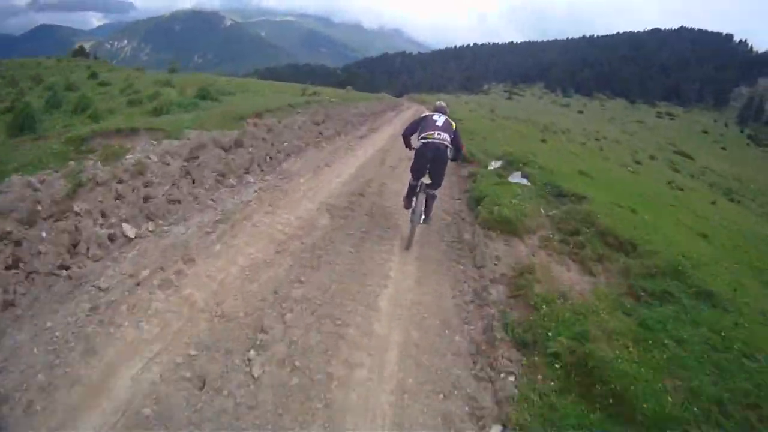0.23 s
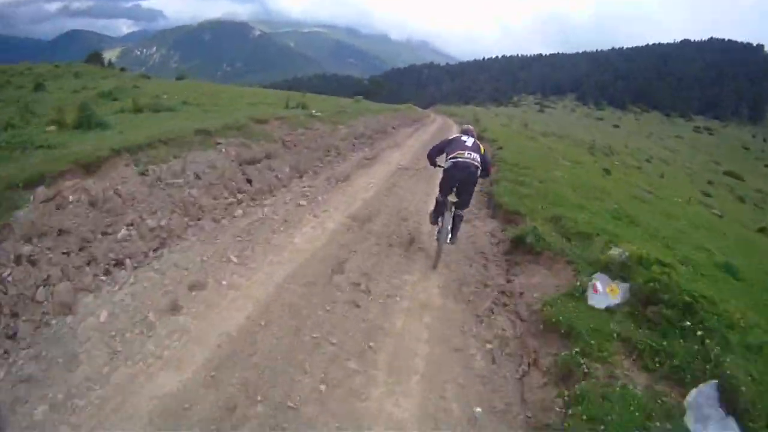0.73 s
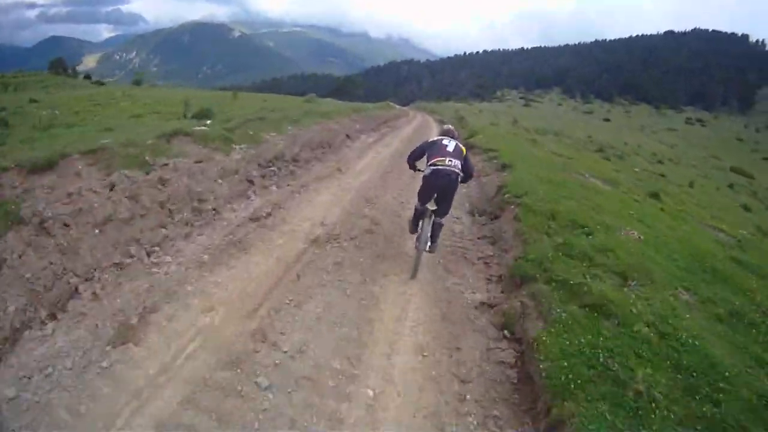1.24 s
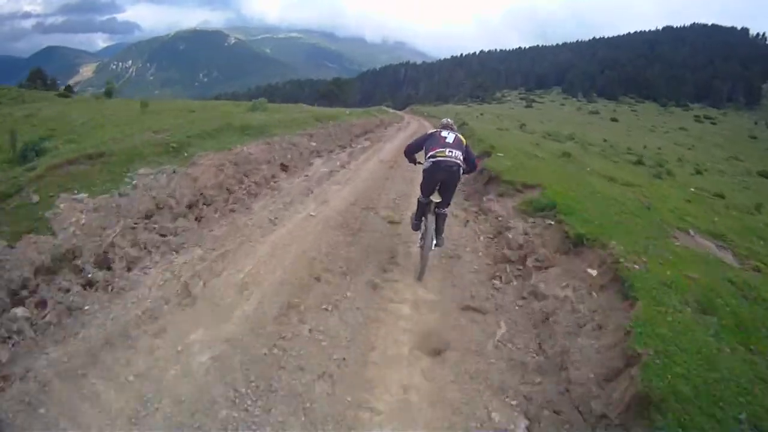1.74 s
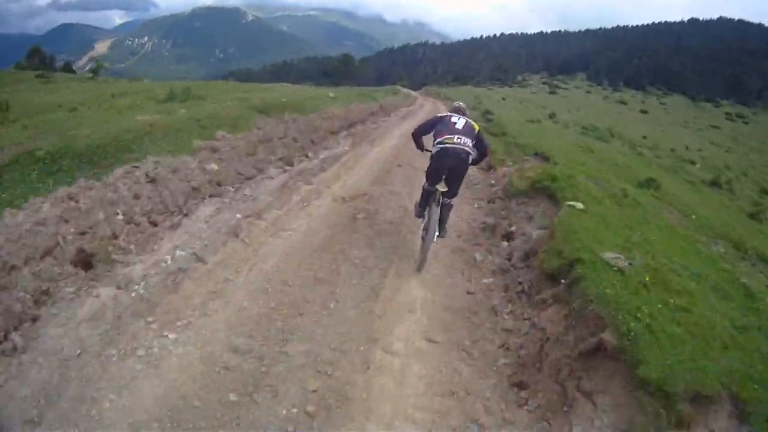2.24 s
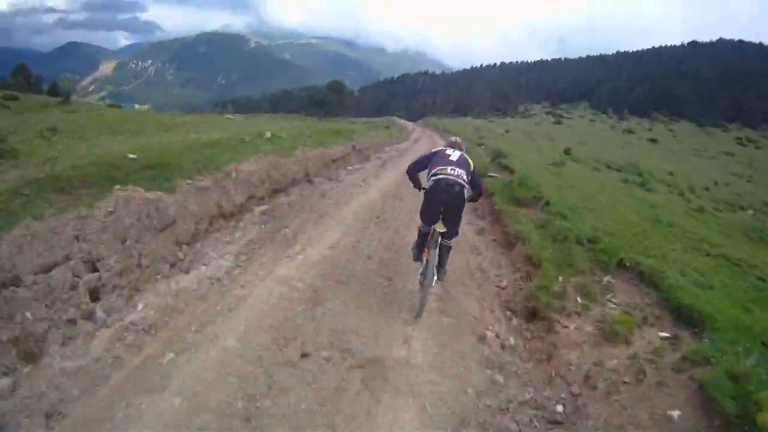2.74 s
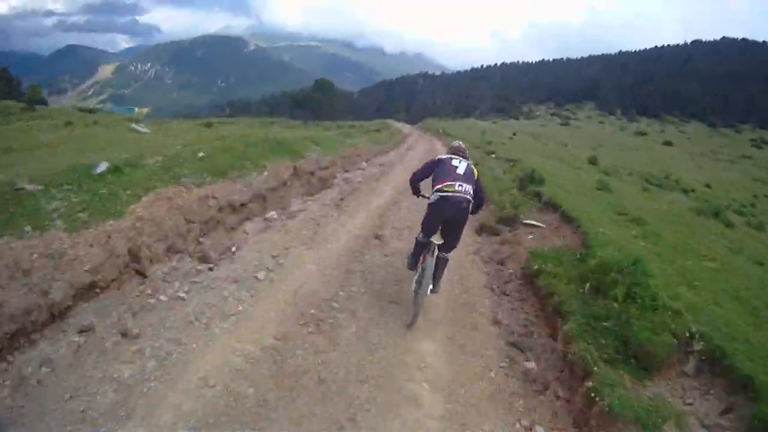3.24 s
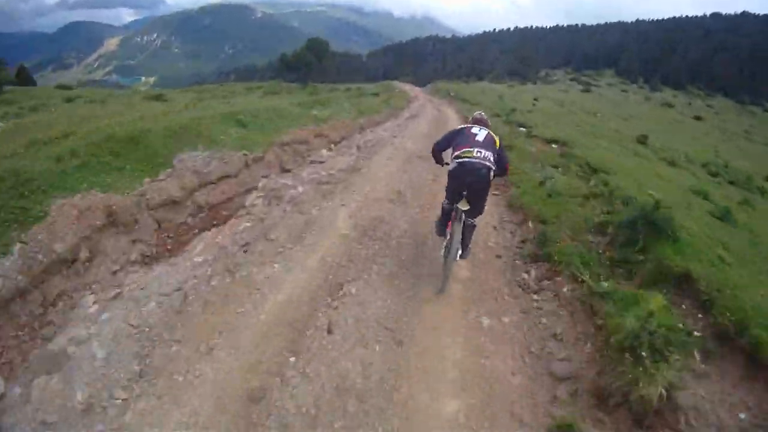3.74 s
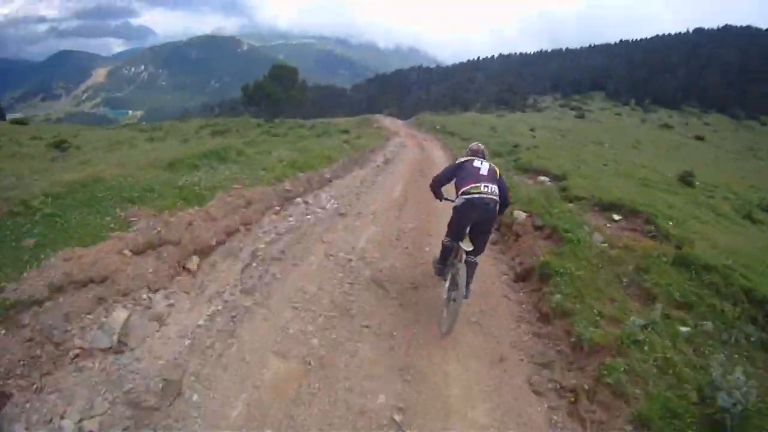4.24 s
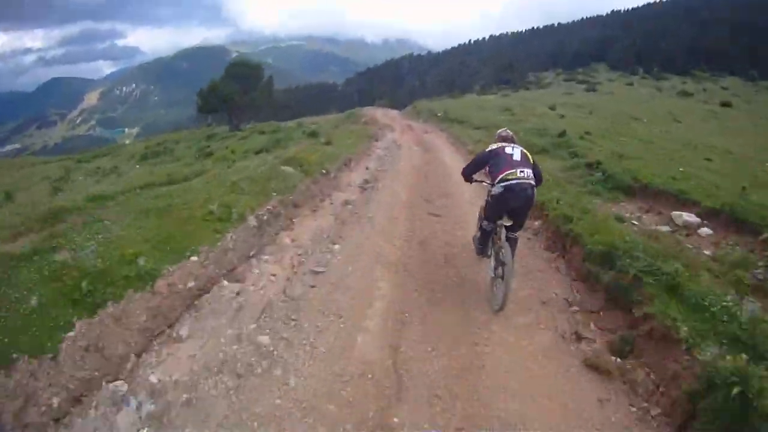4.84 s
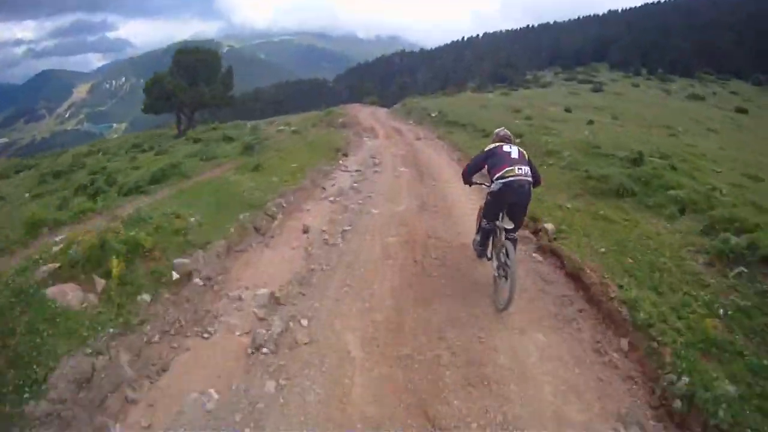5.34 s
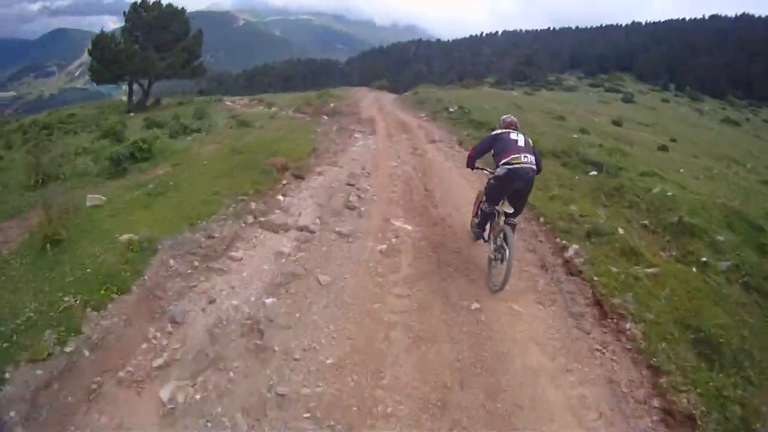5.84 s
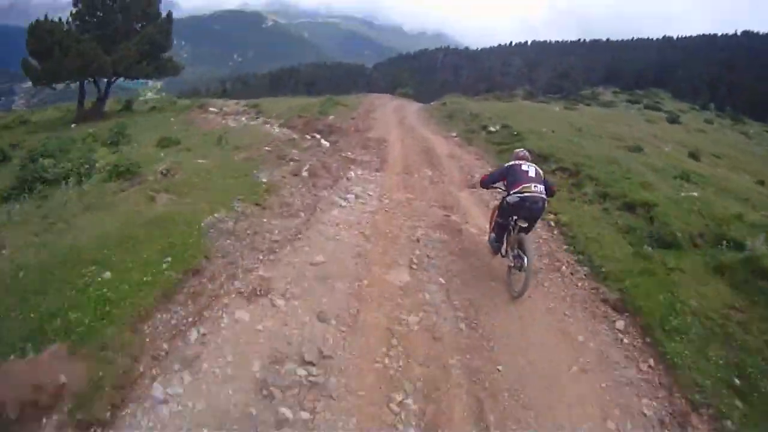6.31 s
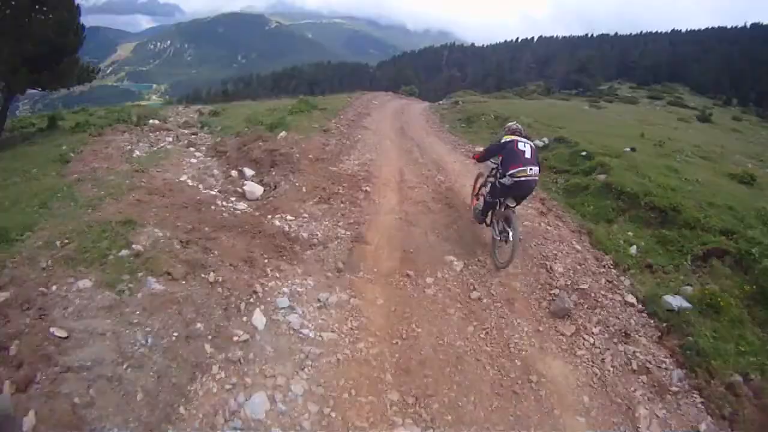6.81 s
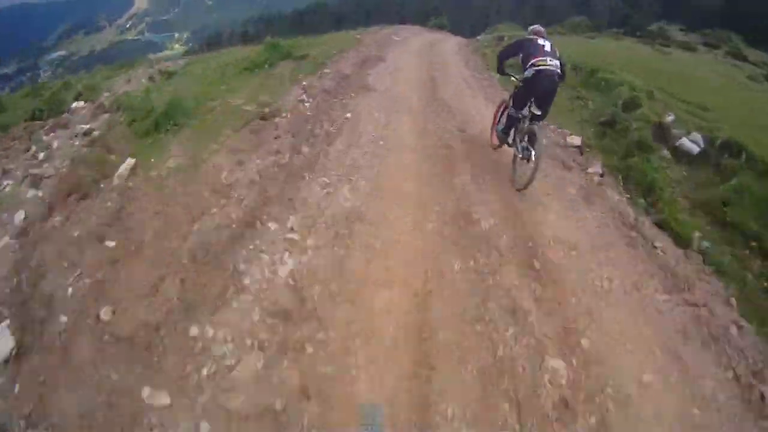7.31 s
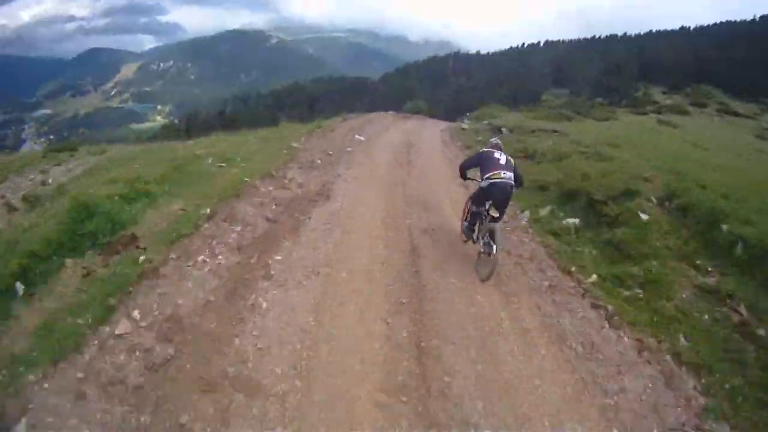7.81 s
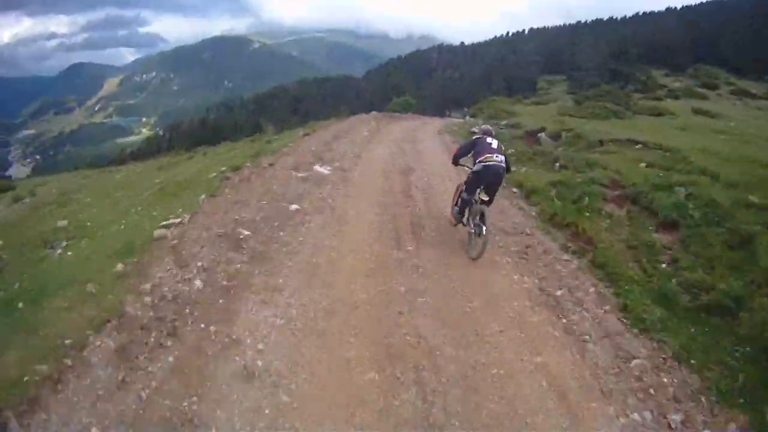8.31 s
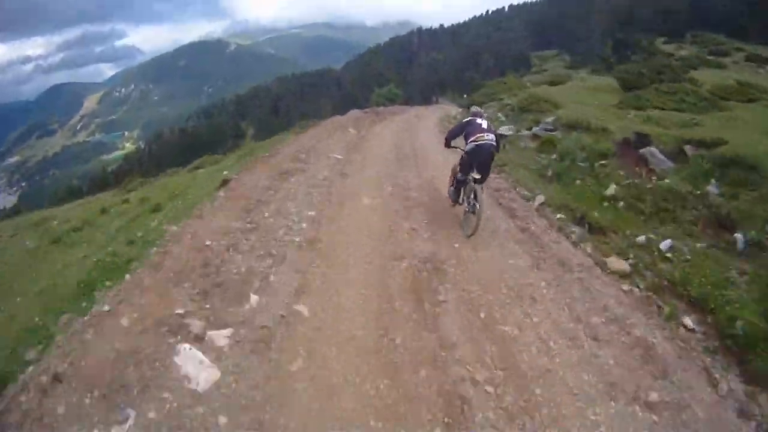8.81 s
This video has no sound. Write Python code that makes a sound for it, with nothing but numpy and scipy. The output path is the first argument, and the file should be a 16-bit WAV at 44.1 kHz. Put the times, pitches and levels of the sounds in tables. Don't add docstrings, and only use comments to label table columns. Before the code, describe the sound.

Breathy, overloading wind whistle around 1.7 kHz flutters over hissing gravel tyres, then gives way to low wind buffeting and sharp stone ticks.

```python
import sys
import numpy as np
from scipy import signal
from scipy.io import wavfile

SR = 44100
rng = np.random.default_rng(int(sys.argv[2]) if len(sys.argv) > 2 else 0)


def boost(x):
    u = np.asarray(x, float) / 20
    return 10 ** u


def wrap_up_sound(samples):
    columns = np.atleast_2d(samples).T
    tamed = np.clip(columns, -1, 1)
    steps = np.round(tamed * 32767).astype(np.int16)
    wavfile.write(sys.argv[1], SR, steps)


N = 399546

# (time [s], peak level [dB], centre pitch [Hz])
SLAPS = [
    (1.836, -2.5, 520),
    (2.189, -15, 400),
    (2.329, -11, 550),
    (2.543, -12, 330),
    (2.77, -11, 500),
    (2.801, -23, 500),
    (3.196, -6.5, 520),
]


def rms_one(x):
    return x / np.sqrt(np.mean(np.abs(x) ** 2) + 1e-20)


def low_noise(hz, white):
    r = np.exp(-2 * np.pi * hz / SR)
    return rms_one(signal.lfilter([1], [1, -2 * r, r * r], white))


def drift(hz):
    return low_noise(hz, rng.standard_normal(N + SR))[SR:]


def resonance(x, hz, width):
    r = np.exp(-np.pi * width / SR)
    top_gain_one = np.array([1, 0, -1]) * (1 - r * r) / 2
    return signal.lfilter(top_gain_one, [1, -2 * r * np.cos(2 * np.pi * hz / SR), r * r], x)


def in_time(rows):
    s, *columns = np.transpose(rows)
    return [np.interp(np.arange(N) / SR, s, c) for c in columns]


def swells(rows, column):
    out = np.zeros(N)
    for row in rows:
        length = row[column] * SR / 1000
        at, reach = int(row[0] * SR), int(row[column] * SR / 400)
        near = np.arange(max(at - reach, 0), min(at + reach, N))
        bell = boost(row[1]) * np.exp(-2 * ((near - at) / length) ** 2)
        out[near] = np.maximum(out[near], bell)
    return out


def banded(white, spectrum, low_hz, count, lumps_db, patchy_db, flicker):
    out = 0
    hz, db = np.transpose(spectrum)
    edges = low_hz * 2 ** (np.arange(count + 1) / 3)
    for k, (low, high) in enumerate(zip(edges, edges[1:])):
        band_pass = signal.butter(2, [low, high], "band", fs=SR, output="sos")
        band = signal.sosfilt(band_pass, white[k % 2])
        level_db = np.interp(np.log(low * high) / 2, np.log(hz), db)
        own_flicker = np.roll(flicker, k * 31337)
        out = out + band * boost(level_db + patchy_db * own_flicker)
    return rms_one(out * boost(lumps_db))


def grains(per_s, spread_db, clump_db):
    size_db = spread_db * np.minimum(rng.exponential(1, (2, N)), 4)
    sizes = boost(size_db) * rng.choice([-1, 1], (2, N))
    chance = per_s * boost(clump_db * drift(30)) / SR
    return rms_one(sizes * (rng.random((2, N)) < chance))


def whistle():
    # (time [s], level [dB], pitch [Hz])
    blowing = [(0.0, -12, 1685), (0.17, -12, 1690), (0.42, -14, 1694), (0.86, -13.5, 1695),
               (1.1, -15.5, 1670), (2.1, -13, 1674), (2.4, -10, 1767), (3.1, -14, 1673), (3.7, -13, 1662),
               (3.94, -11, 1728), (4.04, -16, 1662), (4.43, -15, 1726), (4.51, -23.5, 1684),
               (6.65, -18.5, 1678), (6.85, -22, 1681), (7.3, -15.5, 1650), (7.7, -25.5, 1640),
               (9.06, -25, 1659)]
    # (time [s], change of level [dB], length [ms])
    lulls = [(0.02, -9.5, 30), (0.31, -10, 45), (1.27, -10, 43), (1.42, 2.5, 100), (1.55, -6, 60),
             (1.82, -2, 96), (2.0, -3.5, 50), (3.3, -1, 130), (4.23, -5, 27), (5.75, -5.5, 110),
             (6.619, -6, 26), (7.07, -9, 120), (7.5, 2.5, 60), (8.7, 6, 60), (8.871, 4.5, 60)]
    # (pitch [Hz], width [Hz], level [dB], share of swings followed [0-1])
    housing = [(1232, 30, -40, .6), (1500, 180, -28, .8), (1350, 250, -36, .3), (2250, 600, -37, .5),
               (850, 500, -40, .5)]

    level_db, hz = in_time(blowing)
    level_db = level_db + sum(db * swells([(s, 0, ms)], column=2) for s, db, ms in lulls)
    white = rng.standard_normal((3, N))

    flutter_db = level_db + 5.5 + 0.67 * drift(5.1) + 1.6 * drift(22)
    flutter = low_noise(93.4, white[0] + 1j * white[1]) * boost(flutter_db)
    ceiling = 0.76
    size = np.abs(flutter)
    flutter *= ceiling * np.tanh(size / ceiling) / (size + 1e-9)
    turn = np.exp(2j * np.pi * np.cumsum(hz) / SR)

    rises = beats()
    surge = swells(rises, column=2)
    rise_hz_per_db, waver_hz = 3.6, 18.0
    surge_hz = hz + rise_hz_per_db * in_time(rises)[0] - 0.12 * SR * np.gradient(surge)
    surge_hz = surge_hz + waver_hz * np.roll(low_noise(25, white[0]), SR)
    locked = np.sin(2 * np.pi * np.cumsum(surge_hz) / SR)

    free = np.exp(-(surge / np.minimum(2 * boost(level_db), 0.45)) ** 2)
    tone = free * (flutter * turn).real + surge * locked
    tone = signal.sosfiltfilt(signal.butter(3, 2350, fs=SR, output="sos"), tone)

    swing_db = level_db - np.mean(level_db)
    walls = 0
    for f, width, db, share in housing:
        ring = resonance(resonance(white[2], f, width), f, 0.7 * width)
        walls = walls + boost(db + share * swing_db) * rms_one(ring)
    walls = signal.sosfilt(signal.butter(5, 2600, fs=SR, output="sos"), walls)
    return tone + (0.55 + 0.45 * free) * walls


def beats():
    # (time of first [s], peak level [dB], beat period [ms], beats [count])
    surges = [(0.1822, 1.5, 5.5, 1), (0.4578, 2.5, 6.5, 1), (0.839, 2, 10, 3), (0.8937, 2, 5.82, 1),
              (1.684, 1.5, 6.9, 1), (1.9209, 1, 4.4, 1), (2.108, 0.9, 5, 1), (2.2836, 1, 12, 1),
              (2.3011, 2.5, 4.6, 1), (2.397, 1.7, 14, 3), (2.4449, 1.97, 11, 2), (2.4882, 1.5, 9.5, 3),
              (2.4968, 3.5, 12.6, 1), (2.584, 1.5, 7, 1), (2.6006, 2.5, 11, 2), (2.6519, 3.5, 11, 1),
              (2.711, 2.4, 4.8, 1), (2.793, 5, 5.5, 1), (3.6192, 1, 10.6, 1), (3.6492, 1, 10.3, 1),
              (3.685, 2, 8, 1), (3.735, 2, 17, 1), (3.7968, 2, 9.9, 1), (3.811, 3, 5.4, 1),
              (3.844, 2, 21, 1), (3.8708, 1.5, 9.7, 1), (3.8816, 3, 8.1, 3), (3.9245, 2.5, 7.7, 2),
              (3.9445, 1.3, 12, 2), (7.2566, 0.05, 11, 2)]
    # (time [s], peak level [dB])
    puffs = [(0.079, -1.5), (0.235, -1.5), (0.802, 0), (0.817, 0), (0.9306, -0.4), (1.1778, -0.75),
             (1.4318, -0.5), (1.6359, -0.23), (1.7428, -0.5), (1.852, -.5), (2.0772, -1), (2.124, 0),
             (2.2055, 1), (2.2623, -1.4), (2.352, 0), (2.378, 0.5), (2.6338, 0), (2.733, 0.63), (3.051, -1),
             (3.174, -.5), (3.5466, -.5), (3.7467, -0.4), (3.824, 0), (3.907, 1.2), (4.302, -3),
             (7.282, -0.5), (6.4477, -5.5), (6.5653, -3), (6.684, -4), (7.245, -2.5)]
    beat_fill, longest_beat_ms = 0.85, 8.2
    puff_ms, puff_top_db = 7.9, -1.4

    rows = []
    for s, db, ms, count in surges:
        sounding_ms = beat_fill * (ms if count < 1.5 else min(ms, longest_beat_ms))
        for k in range(round(count)):
            rows.append((s + k * ms / 1000, db, sounding_ms))
    rows += [(s, min(db, puff_top_db), puff_ms) for s, db in puffs]
    return sorted(rows)


def slaps():
    t = np.arange(N) / SR
    out = np.zeros(N)
    for s, db, hz in SLAPS:
        pulse = (t - s) * 4.7 * hz * np.exp(-0.5 * ((t - s) * 7.1 * hz) ** 2)
        out += boost(db) * 1.43 * pulse
    return out


def buffet():
    # (pitch [Hz], level per Hz [dB])
    colour = [(15, -65), (25, -30), (86, -19.5), (284, -3), (358, -2), (482, 1.5), (779, 0), (904, -4.5),
              (1300, -5.5), (1690, -40), (2860, -120)]
    # (time [s], level [dB])
    swing = [(0.0, -46.5), (0.86, -59), (0.96, -38), (1.26, -35), (1.36, -29), (1.6, -29), (1.64, -48),
             (2.9, -50), (3.0, -37), (3.3, -50), (3.46, -40.5), (3.94, -54.5), (4.17, -24), (5.88, -23.5),
             (6.46, -32.5), (7.39, -36), (8.07, -26), (9.06, -24)]
    # (time [s], peak level [dB], length [ms])
    gusts = [(0.0, -26.5, 38), (0.319, -28.5, 184), (0.78, -38, 47), (1.3, -26, 39), (1.6, -24.5, 34),
             (1.84, -31.5, 70), (2.059, -33.5, 260), (2.18, -35, 37), (2.3, -35.5, 53), (2.55, -43, 30),
             (2.79, -30, 68), (3.19, -36, 34), (4.02, -34.5, 90), (6.63, -24.5, 114), (6.98, -24.5, 281),
             (7.519, -26.5, 80), (7.699, -32, 146)]
    lumps_db = 1.39 * drift(15) + 1.3 * drift(87)
    strength = np.hypot(boost(in_time(swing)[0]), swells(gusts, column=2))
    return strength * banded(rng.standard_normal((2, N)), colour, 25.4, 17, lumps_db, 1.0, drift(6.5))


def thumps():
    # (time [s], peak level [dB], centre pitch [Hz], length [ms], low push against the peak [dB])
    lumps = [(0.2, -25, 675, 10, -15), (1.269, -26.5, 543, 10, -9), (1.309, -39, 796, 8.5, -9),
             (1.823, -24, 545, 14, -38), (2.165, -31, 486, 6.2, -14), (2.189, -27, 380, 8.6, -23),
             (2.329, -26.5, 834, 5.6, -23), (2.531, -29.5, 304, 3.5, -16), (2.76, -25, 920, 21, -30),
             (3.193, -30.5, 540, 12, -30), (4.159, -29, 480, 13, -35), (7.116, -27, 158, 13.1, -7)]
    out, white = np.zeros(N), rng.standard_normal(N)
    low = resonance(white, 79, 87)
    for s, db, hz, ms, low_db in lumps:
        puff = resonance(resonance(white, hz, 1.3 * hz), hz, 1.3 * hz)
        puff = puff * swells([(s + 0.49 * ms / 1000, 0, ms)], column=2)
        push = low * swells([(s + 4.0 * ms / 1000, 0, 3.5 * ms)], column=2)
        both = puff / np.abs(puff).max() + boost(low_db) * push / np.abs(push).max()
        out += boost(db + 7.0) * both
    return out


def stones():
    # (time [s], peak level [dB], ring pitch [Hz])
    hits = [(0.8036, -23, 2620), (3.996, -34, 4400), (4.0457, -24, 4450), (4.748, -20, 2738),
            (5.003, -22.5, 4230), (5.039, -24, 4264), (5.1914, -22.5, 4350), (5.6467, -22, 4365),
            (5.867, -25, 4585), (6.1534, -24, 4400), (6.338, -20, 4610), (6.348, -18, 3280),
            (6.3875, -23, 4400), (5.948, -21.5, 2580), (6.538, -25, 4620), (7.0738, -26, 4516),
            (7.1294, -34, 4420), (7.1595, -29, 4420), (7.1728, -22.5, 4440), (7.2198, -24, 4000),
            (7.41, -21.5, 4684), (7.6088, -27.5, 4580), (7.74, -29, 4500), (7.873, -20.5, 4515),
            (7.952, -22, 4450), (7.9827, -21, 4350), (8.2493, -20.5, 4460), (8.541, -23, 4510),
            (8.565, -21, 4420)]
    # (pitch [Hz], width [Hz], level [dB])
    shell = [(4450, 700, -3), (2900, 1000, -8), (6200, 2600, -13)]
    out = np.zeros(N)
    scrapes = rng.standard_normal((len(hits), 300)) * np.exp(-np.arange(300) / 170.0)
    for (s, db, hz), scrape in zip(hits, scrapes):
        scrape = np.pad(scrape, (0, 500))
        ring = 0
        for f, width, gain_db in [*shell, (hz, 0.15 * hz, -2)]:
            ring = ring + boost(gain_db) * resonance(resonance(scrape, f, width), f, 2 * width)
        at = int(s * SR)
        out[at:at + len(ring)] += boost(db - 2.0) * ring / np.abs(ring).max()
    return signal.sosfilt(signal.butter(3, 6160, fs=SR, output="sos"), out)


def tyres():
    # (time [s], roar level [dB], crunch level [dB])
    track = [(0.0, -41.5, -48), (0.35, -45, -65), (1.21, -44, -72.5), (1.82, -44, -69), (2.34, -44, -61),
             (2.55, -42, -58), (2.82, -45.5, -71), (3.53, -41, -62.5), (3.76, -44, -60), (4.11, -42.5, -62),
             (4.67, -39, -59.5), (5.6, -42, -60), (5.85, -40.5, -65.5), (6.79, -43.5, -59),
             (7.22, -40, -52.5), (7.65, -43.5, -62), (9.06, -41.5, -73)]
    # (pitch [Hz], level per Hz [dB])
    roar_colour = [(1590, -36), (2700, 3), (3080, 6.5), (3410, 4.5), (4480, -12.5), (6300, -32.5),
                   (8190, -52), (13900, -120)]
    # (pitch [Hz], level per Hz [dB])
    crunch_colour = [(2350, -32), (4000, -2), (4520, -4.5), (5310, -10.5), (8100, -24), (10000, -35.5),
                     (13000, -60), (22000, -120)]
    roar_db, crunch_db = in_time(track)

    grit = grains(7000, 2.5, 1.8)
    ridge_hz, ridge_width_hz, ridge_db = 4480, 900, -2.5
    ridge = resonance(grit[0] - grit[1], ridge_hz, ridge_width_hz)
    ridge = rms_one(resonance(ridge, ridge_hz, ridge_width_hz))
    roar_lumps_db = 0.8 * drift(30) + 1.2 * drift(5)
    roar = banded(grit, roar_colour, 2500, 4, roar_lumps_db, 1.2, drift(20)) + boost(ridge_db) * ridge

    cracks = grains(1500, 4, 4)[[0, 0]]
    spray_db = 3.5 * drift(40) + 4.2 * drift(5)
    crunch = banded(cracks, crunch_colour, 4000, 4, spray_db, 1.5, drift(25))
    return boost(roar_db - 3.0) * roar + boost(crunch_db + 10.0) * crunch


def squeaks():
    # (time [s], peak level [dB])
    rubs = [
        (.81, -54),
        (4.38, -60),
        (4.82, -52),
        (8.53, -60),
        (8.971, -58),
    ]
    noise = resonance(rng.standard_normal(N), 8900, 1300)
    noise = rms_one(resonance(noise, 8900, 1300))
    return noise * swells([(s, db, 16.0) for s, db in rubs], column=2)


def electronics():
    whine_hz, flips_per_s, whine_db = 7867.1, 59.94, -63
    hum_hz, hum_width_hz, hum_db = 73, 24.0, -60
    hiss_db = -61.5
    t = np.arange(N) / SR
    flips = np.tanh(7.7 * np.sin(np.pi * flips_per_s * t))
    whine = np.sqrt(2) * boost(whine_db) * flips * np.sin(2 * np.pi * whine_hz * t)
    white = rng.standard_normal((2, N))
    hum = resonance(resonance(white[0], hum_hz, hum_width_hz), hum_hz, hum_width_hz)
    return whine + boost(hum_db) * rms_one(hum) + boost(hiss_db) * white[1]


def scene():
    choke = 1 - swells([(s, -3, 14) for s, db, hz in SLAPS], column=2)
    air = choke * whistle() + buffet() + thumps() + slaps()
    return (air + tyres() + stones() + electronics() + squeaks())[None]


def band_limit(x):
    return signal.sosfilt(signal.butter(12, 16130, fs=SR, output="sos"), x)


def record(dry):
    top, bias, knee = 0.91, 0.015, 75.0
    low_hz, high_hz = 500, 2500
    zero, pole = np.exp(-2 * np.pi * low_hz / SR), np.exp(-2 * np.pi * high_hz / SR)
    turn = np.exp(-2j * np.pi * 1700 / SR)
    unit = abs((1 - pole * turn) / (1 - zero * turn))
    ahead = signal.lfilter([1, -pole], [unit, -unit * zero], dry) + bias
    clipped = ahead / (1 + np.abs(ahead / top) ** knee) ** (1 / knee) - bias
    mix = signal.lfilter([unit, -unit * zero], [1, -pole], clipped)
    mix = signal.lfilter(*signal.butter(1, 35, "high", fs=SR), mix)
    mix = np.clip(mix, -0.985, 0.985)
    mix = signal.sosfilt(signal.cheby2(12, 60, 16100, fs=SR, output="sos"), mix)
    return band_limit(mix)


dry = scene()
out = record(dry)
wrap_up_sound(out)
```